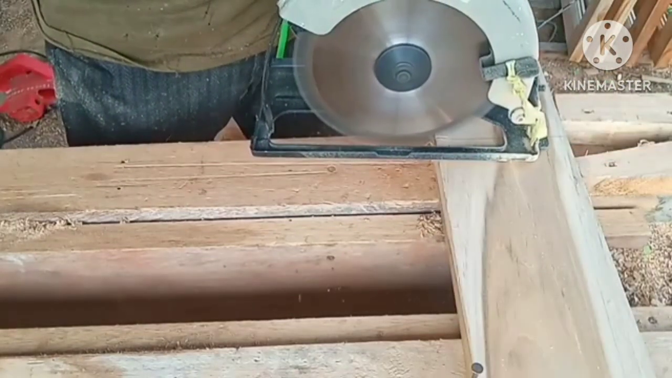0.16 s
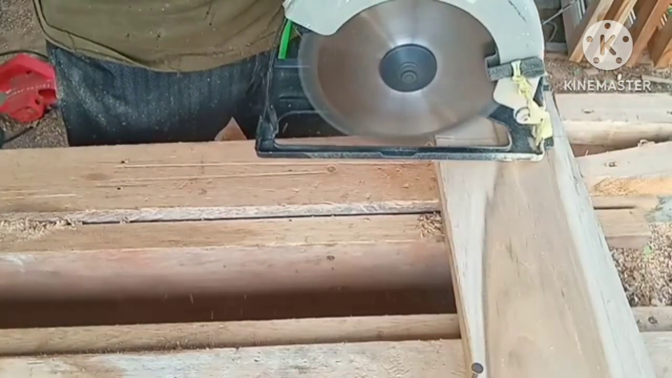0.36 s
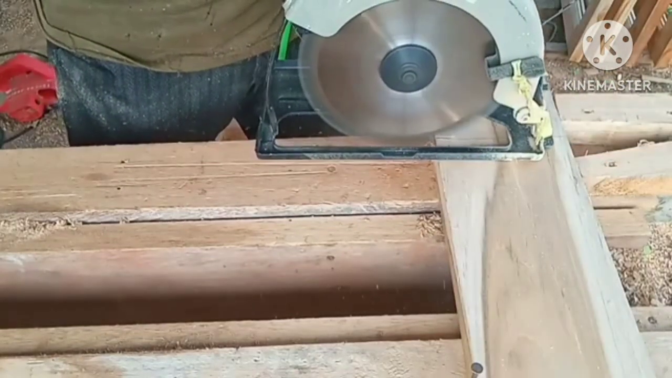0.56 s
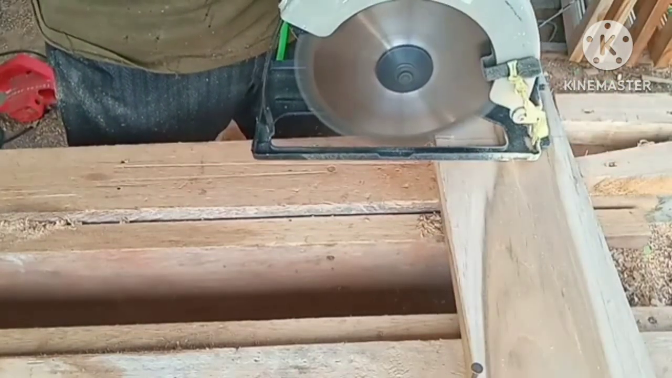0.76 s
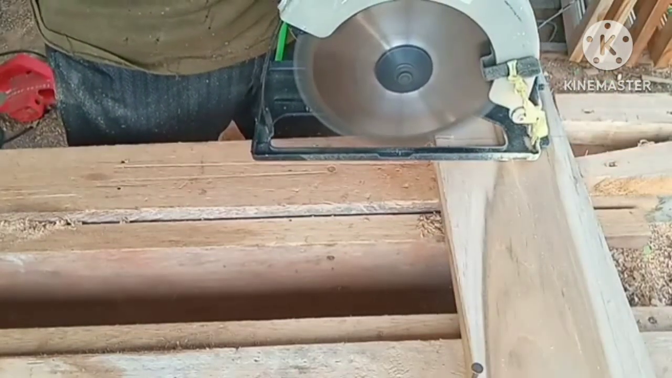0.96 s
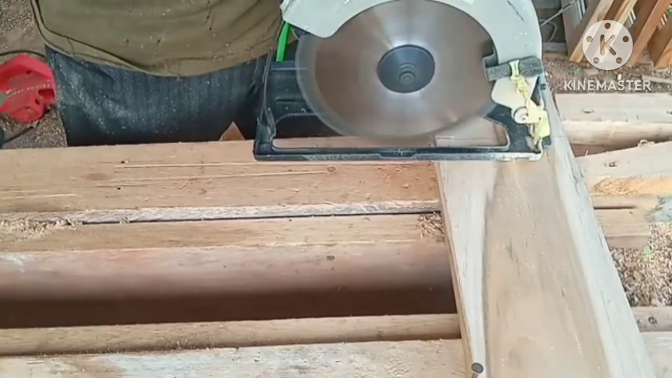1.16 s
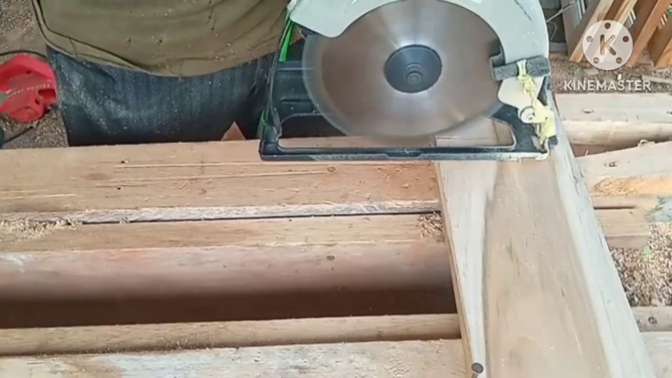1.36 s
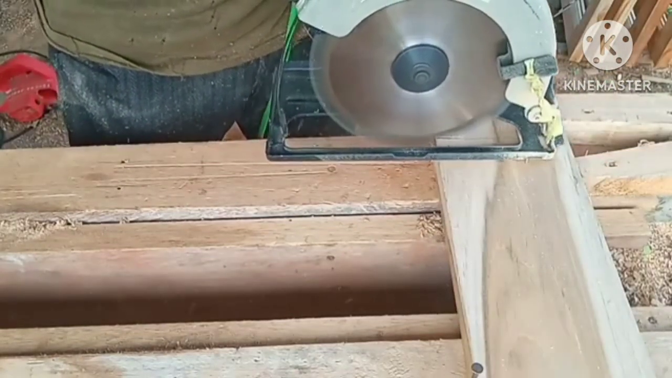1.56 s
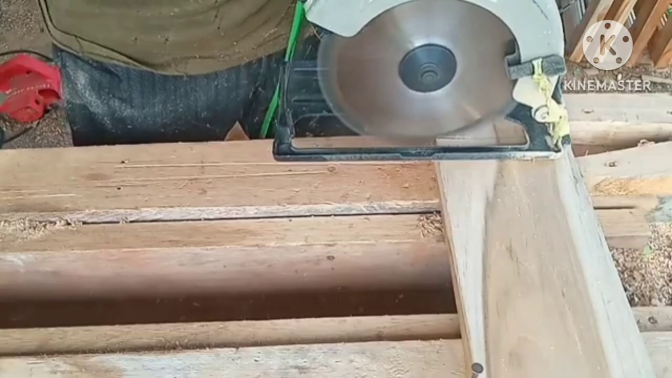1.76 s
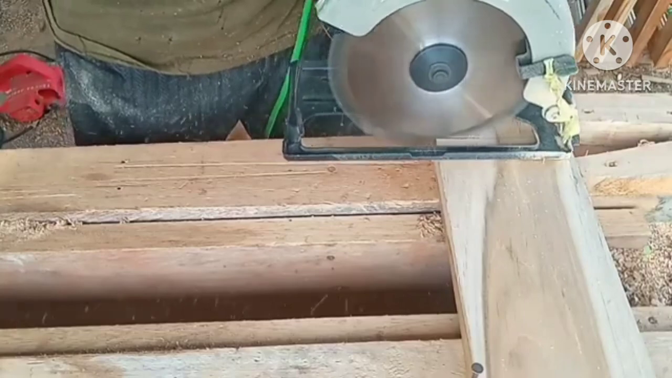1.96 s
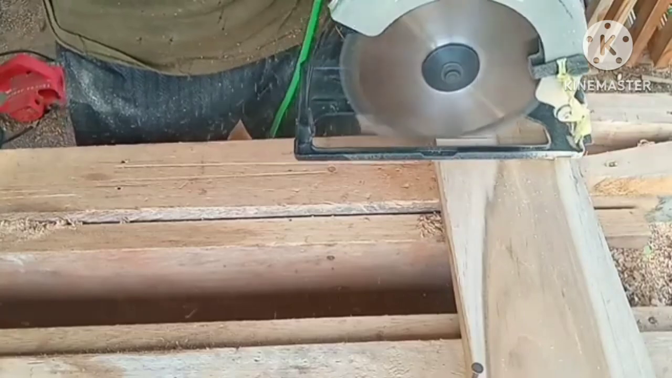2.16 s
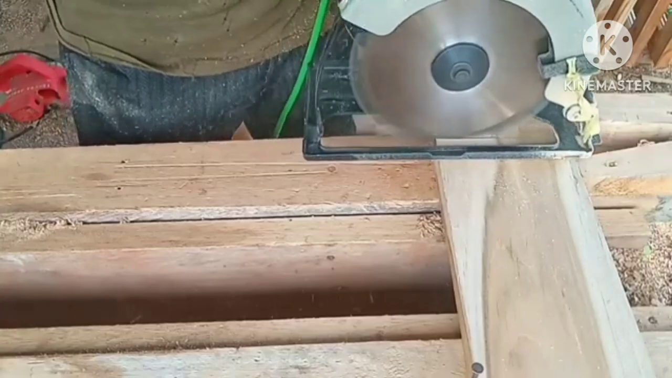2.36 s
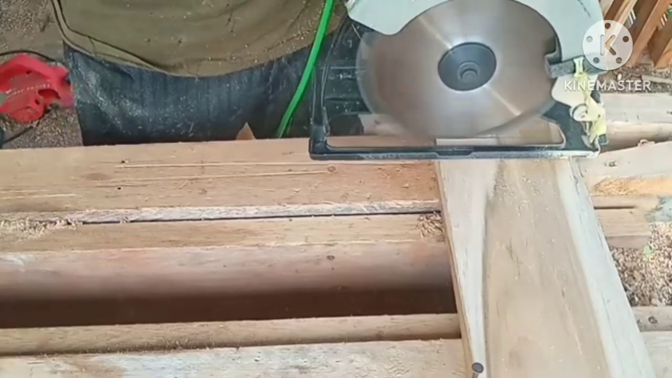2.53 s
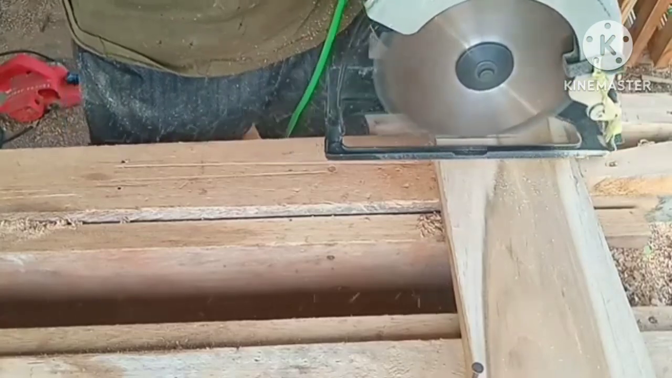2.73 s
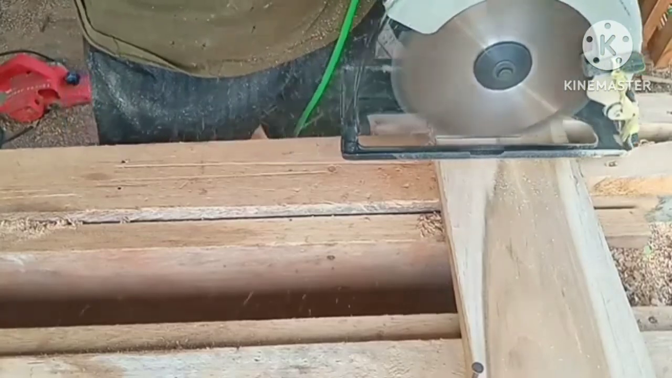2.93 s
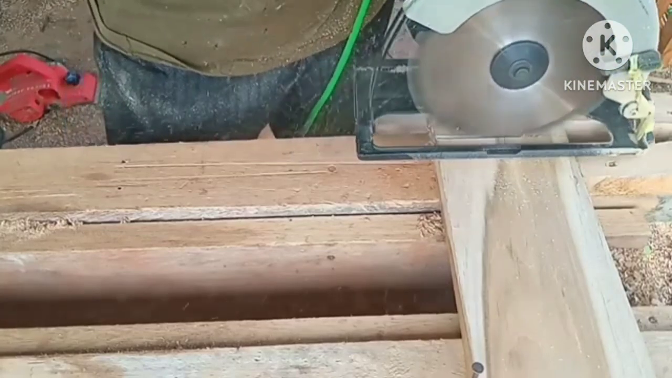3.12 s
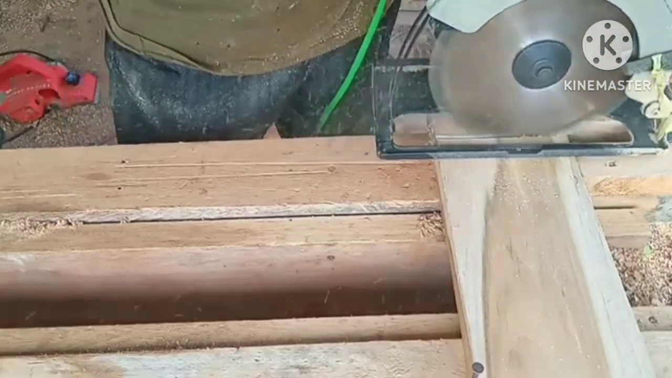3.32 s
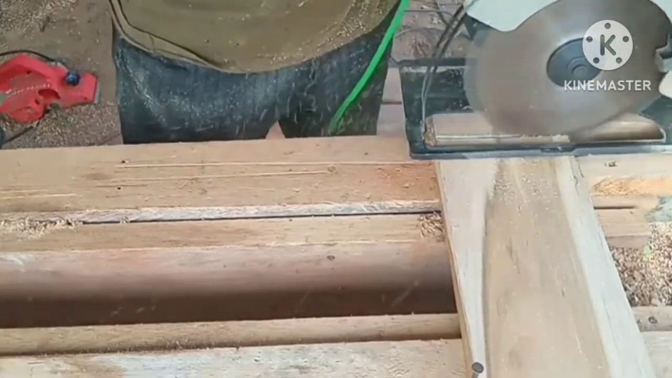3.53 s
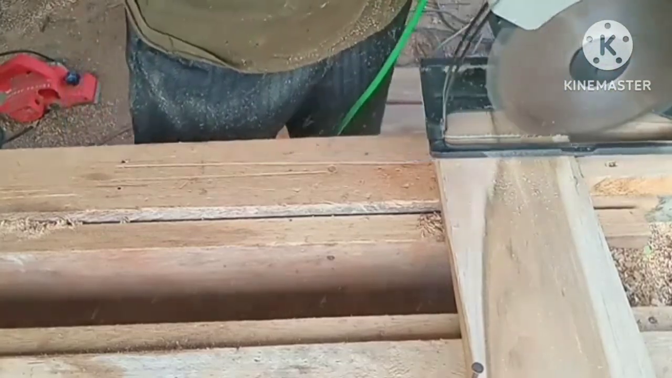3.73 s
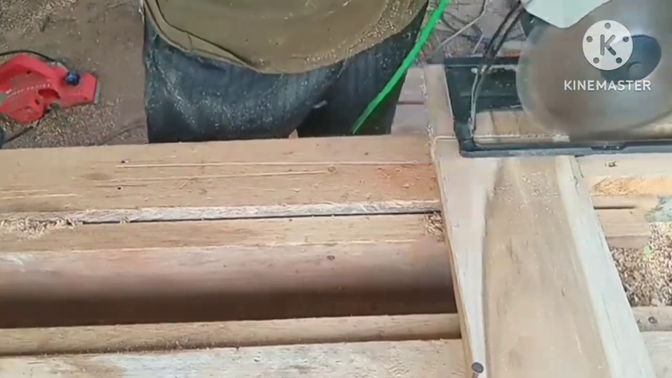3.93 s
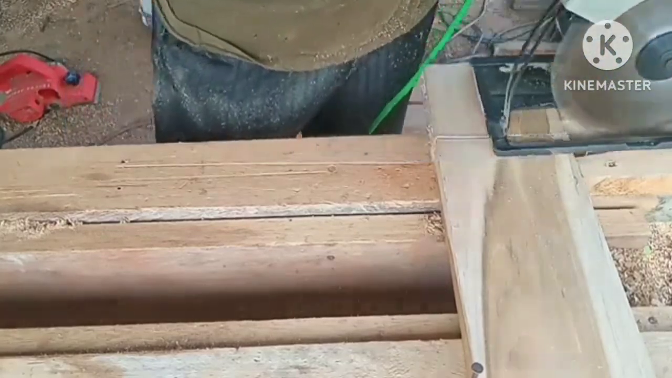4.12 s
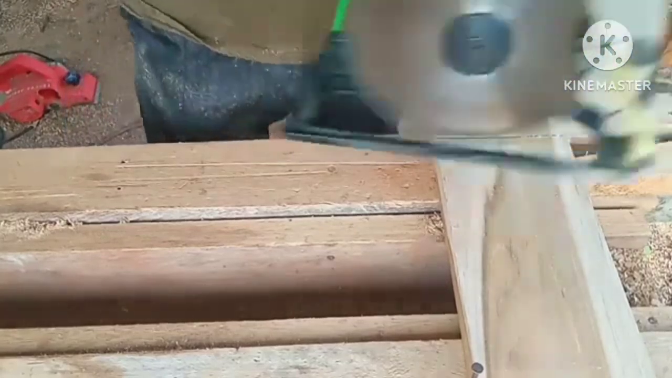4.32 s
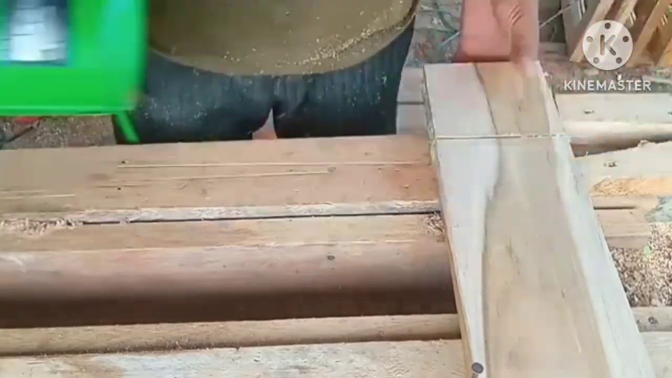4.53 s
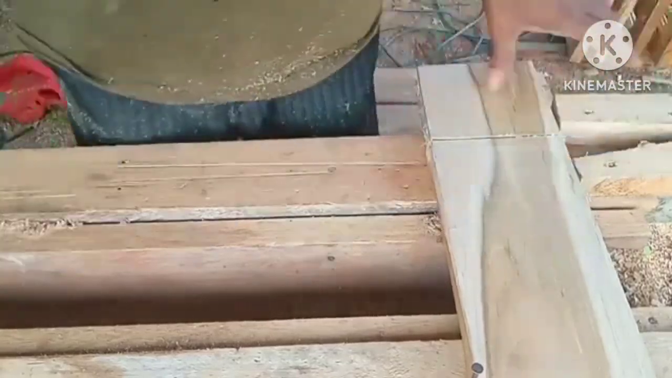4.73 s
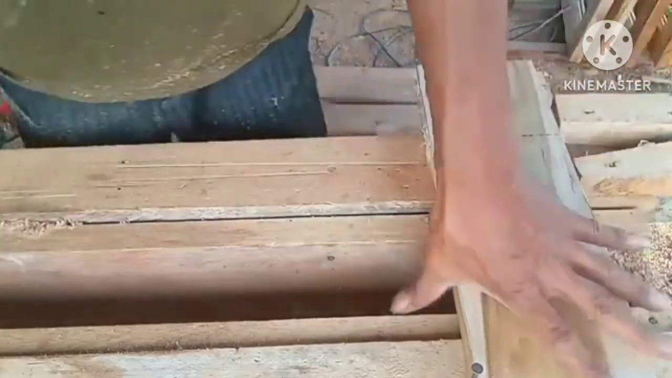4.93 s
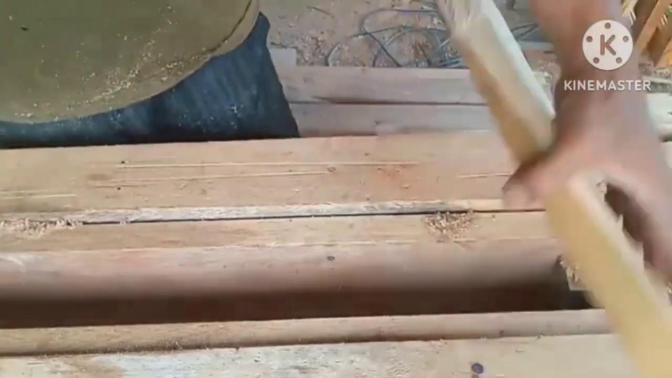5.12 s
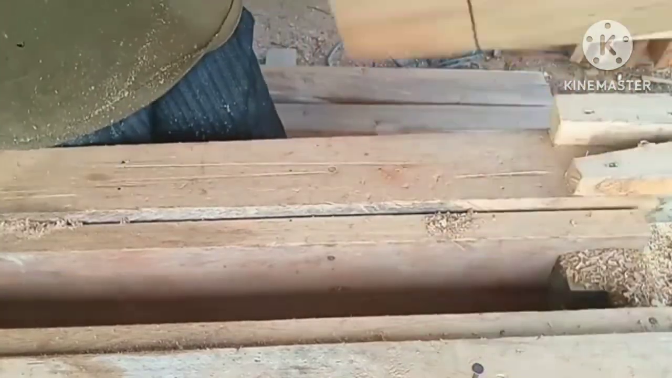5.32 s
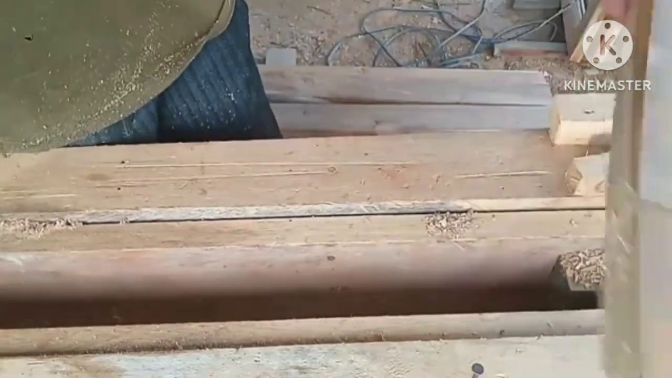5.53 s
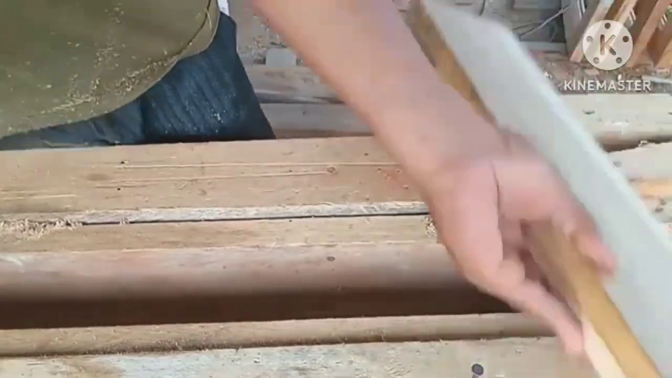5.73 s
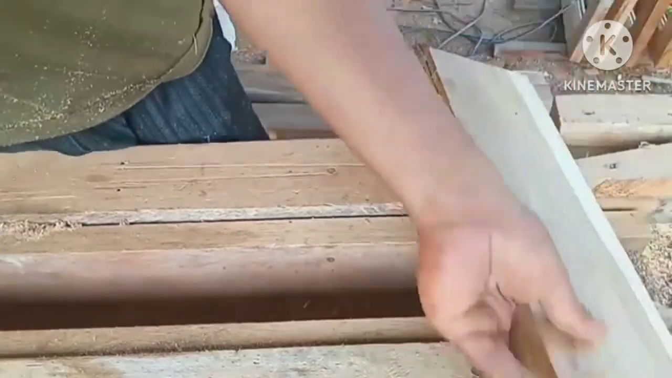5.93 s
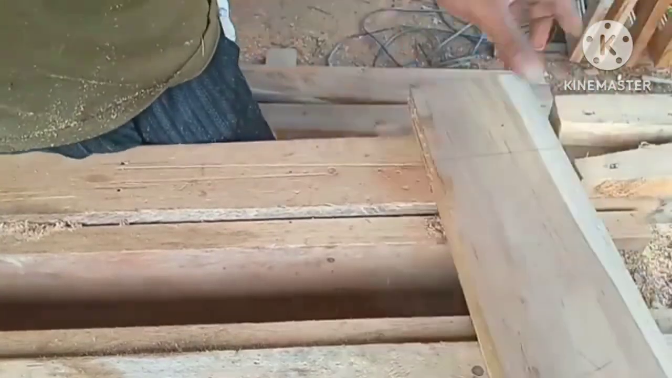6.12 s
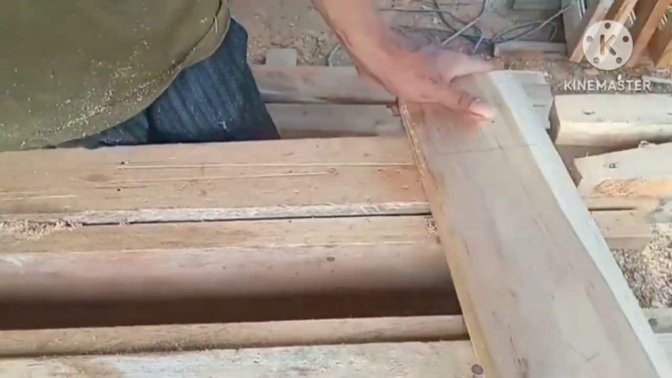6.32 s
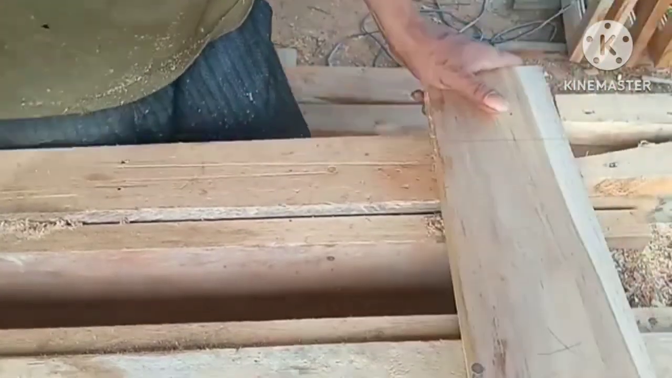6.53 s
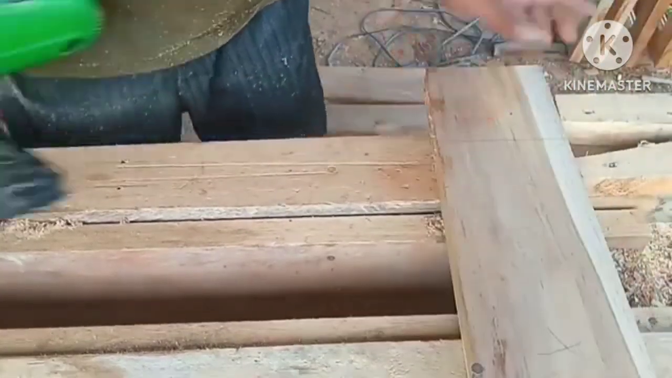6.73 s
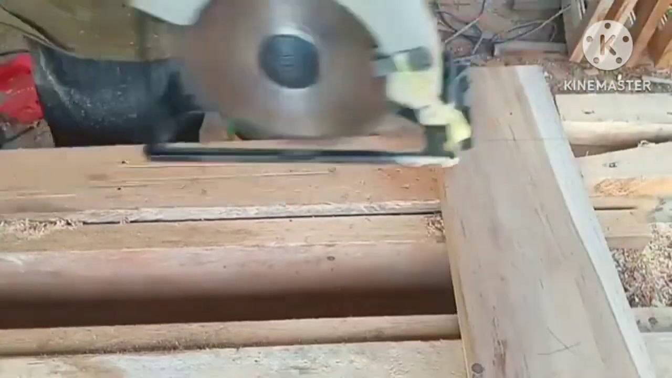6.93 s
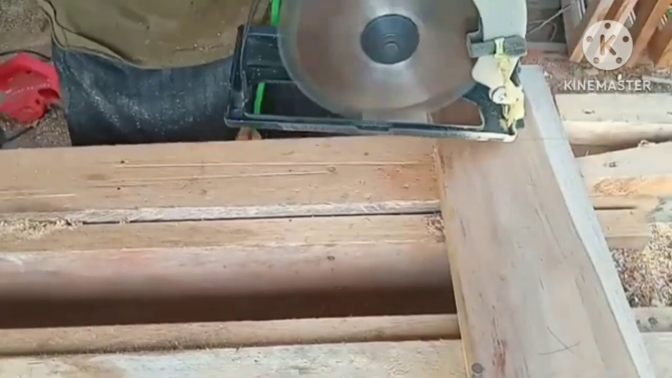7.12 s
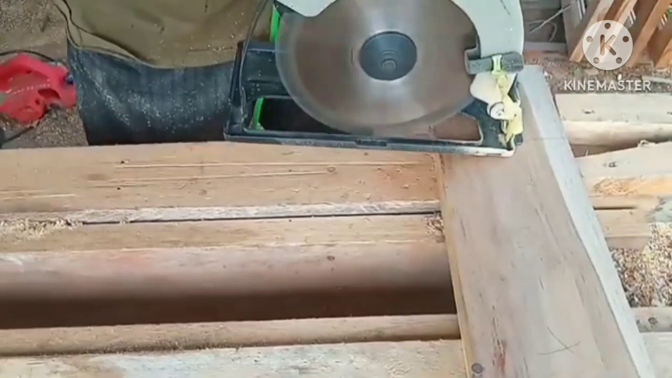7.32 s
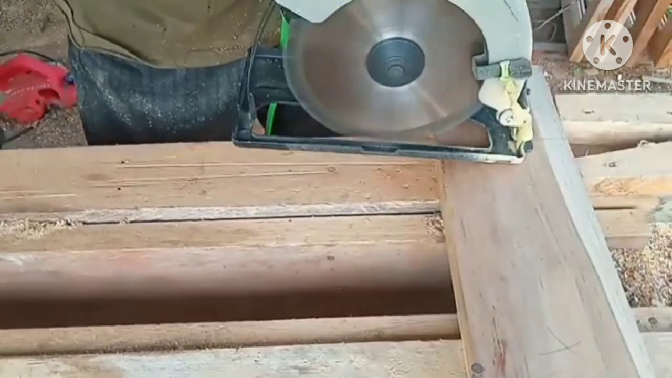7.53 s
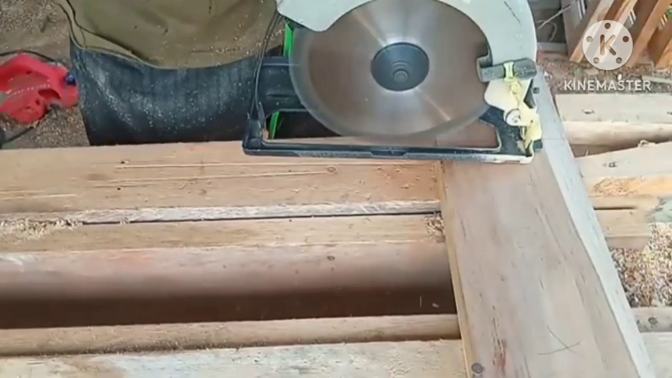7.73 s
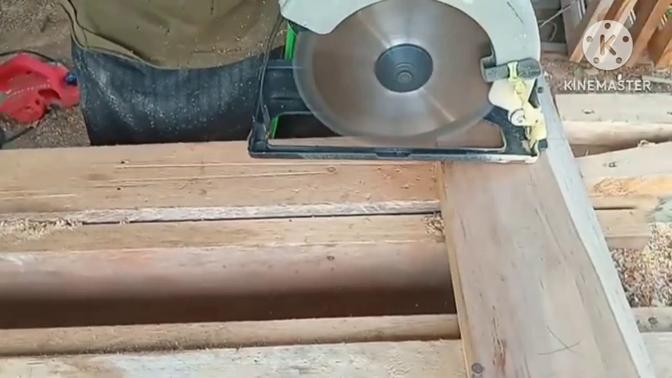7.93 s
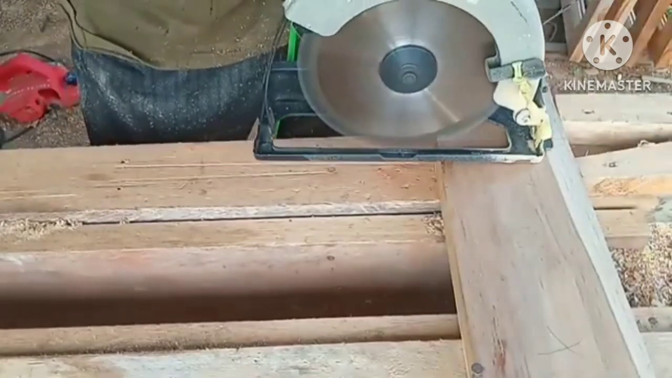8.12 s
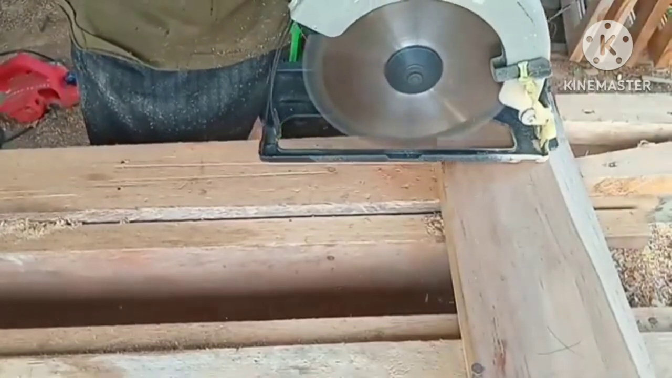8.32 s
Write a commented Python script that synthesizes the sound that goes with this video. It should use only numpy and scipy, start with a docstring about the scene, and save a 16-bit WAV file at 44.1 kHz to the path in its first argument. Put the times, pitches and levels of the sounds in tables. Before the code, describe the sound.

A handheld circular saw tears through a wooden board with a harsh, ringing rasp, its pitch sagging under load. The blade comes free with a brief metallic ring and the motor coasts down in a falling whine. Meanwhile timber slides, bumps and drops with a sharp knock. The trigger clicks, the saw whines up and bites into wood again, all close to one small microphone in a workshop.

```python
"""At a trestle, a handheld circular saw cuts a board, coasts down while the board is turned and dropped,
then is triggered again and bites. In the wood, chips tear as noise, the teeth hammer out a comb of tones
and the steel disc rings. Between cuts come fan air and the whine of gears and commutator, with the
slides, thumps and knocks of timber. The comb and whines drop in pitch as the shaft slows.
One small phone microphone hears it all through a look-ahead limiter."""
import sys
import numpy as np
from scipy import signal
from scipy.fft import rfft, irfft
from scipy.io import wavfile
from scipy.ndimage import uniform_filter1d, minimum_filter1d

SR = 44100
rng = np.random.default_rng(int(sys.argv[2]) if len(sys.argv) > 2 else 0)


def dump_mix(stems):
    """Bounce the given channels to the path in sys.argv[1] as a 16-bit WAV at rate SR."""
    frames = np.atleast_2d(stems).T  # one column per channel
    limited = np.clip(frames, -1, 1)  # hard clip at full scale
    pcm = np.round(limited * 32767).astype(np.int16)
    wavfile.write(sys.argv[1], SR, pcm)


N = 373527

EDGE_HZ = 15400  # top of the audible band in this scene
SLOW_TURNS = 75  # turns per second; the upper whine partials change level relative to this speed
# Spectrum of tearing wood. Each row: frequency in Hz, relative level in dB.
CHIP_SPECTRUM = [(24, -61), (40, -39), (89, -63), (169, -8), (1630, 0.5), (1800, -5.5), (2480, 2),
                 (3180, -0.5), (3690, -0.5), (6070, -6), (6540, -11.5), (7980, -28), (10400, -27.5),
                 (11600, -26), (12500, -42), (13300, -28), (14200, -36), (15500, -32)]
# Spectrum of the fan's rush, which also colours the whines. Each row: frequency in Hz, gain in dB.
AIR_SPECTRUM = [(120, -22), (200, -9), (370, -8.5), (793, 2), (934, 1), (1250, 9), (1930, 0.5), (2270, 8.5),
                (2930, 5.5), (3910, 3.5), (4610, 3.5), (6160, 0), (8530, -25), (12300, -18), (15500, -44)]
# Resonances of the saw's casing. Each row: frequency in Hz, width in Hz, gain in dB.
CASING_MODES = [(2180, 750, 3), (3100, 32, 6.5), (4010, 1240, 5), (5170, 380, 4.5), (6150, 280, -3.5),
                (8870, 55, -20), (9400, 60, -19), (10760, 240, -19.5)]


def amp(db):
    """Decibels to gain."""
    return 10 ** (np.asarray(db) / 20)


def unit_rms(x):
    """Scales to rms 1."""
    return x / np.sqrt(np.mean(x ** 2) + 1e-20)


def spectrum_db(points, hz):
    """A spectrum's level in dB at hz, silent outside its ends."""
    f, db = np.transpose(points)
    return np.interp(np.log(hz + 1), np.log(f + 1), db, left=-90, right=-90)


def spectrum(points):
    """A spectrum in dB as a gain function of frequency."""
    return lambda hz: amp(spectrum_db(points, hz))


def resonances(modes):
    """A set of resonant peaks as a gain function of frequency."""
    return lambda hz: np.sqrt(sum(amp(db) ** 2 / (1 + (2 * (hz - f) / width) ** 2) ** 2
                                  for f, width, db in modes))


def automation(rows):
    """The samples that a table of timed rows spans, and each further column as a curve over them."""
    times, *columns = np.transpose(rows)
    at = np.arange(max(round(times[0] * SR), 0), min(round(times[-1] * SR), N))
    return at, [np.interp(at / SR, times, column) for column in columns]


def wander(per_s, count, size):
    """Rows of smooth random drift, rms 1, one value for every 64 samples."""
    span = max(round(SR / 64 / per_s), 1)
    rows = uniform_filter1d(rng.standard_normal((count, size)), span, 1)
    rows = uniform_filter1d(rows, span // 2 + 1, 1)
    return rows / rows.std(1, keepdims=True)


def noise(colour, patchy_db, flicker_db, size=512):
    """Coloured noise, rms 1, with drifting spectral patches and a flicker of the whole level."""
    frames, hz = N // (size // 4) + 5, np.fft.rfftfreq(size, 1 / SR)
    real, imag, patches = rng.standard_normal((frames, len(hz), 3)).T
    patches = unit_rms(uniform_filter1d(uniform_filter1d(patches, 6, 0), 20, 1))
    flicker = unit_rms(uniform_filter1d(rng.standard_normal(frames), 4))
    spectra = (real + 1j * imag) * colour(hz)[:, None] * amp(patchy_db * patches + flicker_db * flicker)
    return unit_rms(signal.istft(spectra, nperseg=size, noverlap=size - size // 4)[1][:N])


def shaft_tones(speed, partials, swell_db, per_s, wobble, shakes_per_s=120, colour=np.ones_like):
    """Sines at (multiple of shaft speed, dB); each swells and wobbles in phase (cycles) on its own."""
    turns, coarse_speed = np.cumsum(speed) / SR, speed[::64]
    coarse, fine = np.arange(len(coarse_speed)) * 64, np.arange(len(speed))
    swells = wander(per_s, len(partials), len(coarse))
    shakes = wander(shakes_per_s, len(partials), len(coarse))
    out = np.zeros(len(speed))
    for (multiple, db), swell, shake in zip(partials, swells, shakes):
        hz = multiple * coarse_speed
        gain = np.interp(fine, coarse, colour(hz) * (hz < EDGE_HZ) * amp(db + swell_db * swell))
        phase = rng.random() + np.interp(fine, coarse, wobble * shake)
        out += gain * np.sin(2 * np.pi * (multiple * turns + phase))
    return out


def shaft_speed():
    """Turns per second: loaded in the cuts, coasting against friction and fan drag, then running up."""
    # Speed under load, one table a cut. Each row: time in seconds, turns per second.
    cut_speeds = [
        [(0, 235), (.5, 234.8), (.65, 232.5), (.9, 236.2), (1.4, 236.9), (1.6, 233.2), (2, 223.7), (2.4, 211.4),
         (2.6, 207.3), (3.1, 188.6), (3.6, 181.3), (3.8, 197.8), (4.1, 215.8), (4.22, 233), (4.3, 231.8)],
        [(8.1, 218.1), (8.2, 222.8), (8.47, 227.5)],
    ]
    friction, fan_drag = 30.87, .0014217  # deceleration = friction + fan_drag * speed ** 2
    trigger_s, run_up_s, bite_s = 7.485, .253, 8.03
    restart_turns, free_turns = 93, 246.4  # the rising whine begins abruptly at the first
    t = np.arange(N) / SR
    first, second = map(np.transpose, cut_speeds)
    exit_s, exit_turns = first[:, -1]
    balance = np.sqrt(friction / fan_drag)  # the speed at which drag equals friction
    slowed = np.sqrt(friction * fan_drag) * np.clip(t - exit_s, 0, trigger_s - exit_s)
    coast = balance * np.tan(np.arctan(exit_turns / balance) - slowed)
    run_up = free_turns - (free_turns - restart_turns) * np.exp(-np.maximum(t - trigger_s, 0) / run_up_s)
    loaded = np.clip((t - bite_s) / (second[0, 0] - bite_s), 0, 1)
    restart = (1 - loaded) * run_up + loaded * np.interp(t, *second)
    return np.select([t < exit_s, t < trigger_s], [np.interp(t, *first), coast], restart)


def board_handling():
    """Turning the board makes a lumpy rumble and the hiss of wood sliding on wood."""
    # The board's movement. Each row: time in seconds, rumble level in dB, slide level in dB.
    levels = [(4.3, -71, -50), (4.9, -54.5, -45), (5.31, -58.5, -36), (5.97, -45, -40), (6.33, -62.5, -48),
              (6.61, -47.5, -47), (7, -55.5, -67), (7.36, -55, -57), (7.95, -70, -37.5), (8.47, -55, -48)]
    # Spectra of the bumping and the sliding. Each row: frequency in Hz, relative level in dB.
    rumble_spectrum = [(40, -30), (80, -11), (130, -0.5), (200, -8.5), (320, -9), (500, -36)]
    slide_spectrum = [(400, -8), (620, -13), (720, 1), (850, -8.5), (1150, -1), (1400, -5), (1800, -14.5)]
    out = np.zeros(N)
    at, (rumble_db, slide_db) = automation(levels)
    rumble = noise(spectrum(rumble_spectrum), patchy_db=3, flicker_db=2.8, size=1024)[at]
    slide = noise(spectrum(slide_spectrum), patchy_db=-.5, flicker_db=1.6, size=1024)[at]
    out[at] = (amp(rumble_db) * rumble + amp(slide_db) * slide) * signal.windows.tukey(len(at), .02)
    return out


def trestle_thumps():
    """Timber bumps the trestle: a few low cycles each time, quickly damped."""
    # Dull bumps. Each row: start in seconds, envelope peak in dB, pitch in Hz.
    bumps = [(4.669, -44, 174), (5.387, -39, 172), (5.619, -39, 153), (5.735, -26.5, 207), (5.76, -30, 178),
             (5.817, -34.5, 189), (6.498, -45, 116), (6.657, -39, 198), (6.745, -38, 195), (6.85, -37, 160)]
    out, t = np.zeros(N + 4000), np.arange(4000) / SR
    envelope = t / .005 * np.exp(1 - t / .005)
    for start, db, hz in bumps:
        out[round(start * SR):][:len(t)] += amp(db) * envelope * np.sin(2 * np.pi * hz * t)
    return out[:N]


def knocks():
    """Each blow is a short crack plus the ringing modes of the board; dull blows land softly."""
    # Knocks of the board and the trigger. Each row: start in seconds, peak in dB, crack tilt in dB per
    # octave, ring t60 in seconds, pitch in Hz near which the modes ring most.
    blows = [(5.904, -24.5, -5, 0.096, 450), (5.993, -18, -6, 0.11, 556), (6.151, -3.5, -1, 0.14, 950),
             (6.194, -22.5, -6.5, 0.17, 680), (6.552, -21.5, -5.5, 0.13, 685),
             (6.582, -25, -6.5, 0.09, 422), (7.372, -27.5, -2.5, 0.077, 1000),
             (7.486, -9.5, -0.5, 0.12, 2080)]
    # Modes of the board. Each row: frequency in Hz, relative level in dB.
    board_modes = [(300, -2), (440, 2), (680, 0.5), (780, -2.5), (921, 4), (1170, -4), (2126, 6)]
    out, t = np.zeros(N + 9000), np.arange(9000) / SR
    hz = np.fft.rfftfreq(len(t), 1 / SR)
    for start, peak_db, tilt, t60, near_hz in blows:
        ring = sum(amp(db - 13 * abs(np.log2(f / near_hz)) - 60 * t / t60) * np.sin(2 * np.pi * f * t)
                   for f, db in board_modes)
        colour_db = tilt * np.log2(np.maximum(hz, 150) / 900) + spectrum_db(CHIP_SPECTRUM, hz)
        crack = unit_rms(irfft(rfft(rng.standard_normal(len(t))) * amp(colour_db), len(t)))
        crack *= amp(.6 * tilt - 60 * np.maximum(t - .008, 0) / .024)
        attack_s = .0005 - .0017 * min(tilt, 0)
        knock = (.37 * ring + crack) * np.minimum(t / attack_s, 1)
        out[round(start * SR):][:len(t)] += amp(peak_db) * knock / abs(knock).max()
    return out[:N]


def shaft_hum(speed, t):
    """A faint hum that falls with the shaft while the saw is set aside."""
    gate = np.interp(t, [4.5, 4.55, 5.7, 5.75], [0, 1, 1, 0])
    return gate * shaft_tones(speed, [(7 / 3, -60)], swell_db=2.5, per_s=8, wobble=.05)


def commutator_whine(speed, t):
    """The commutator bars pass the brushes and give a thin whine with overtones."""
    # The whine before colouring. Each row: time in seconds, fundamental in dB, octave in dB.
    levels = [(4.15, -60, -56), (4.4, -51, -54), (4.82, -46, -52), (4.96, -57, -45), (5.1, -48, -44),
              (5.26, -60, -52), (5.45, -48, -58), (5.9, -52, -60), (6.05, -58, -60), (6.4, -60, -60),
              (6.7, -56, -53), (6.97, -56, -45), (7.1, -58, -52), (7.22, -58, -47), (7.35, -60, -58),
              (7.62, -54, -58), (7.75, -41, -55), (7.86, -52, -58), (8.47, -48, -58)]
    bars, air = 28, spectrum(AIR_SPECTRUM)
    times, *columns = np.transpose(levels)
    whine_db, octave_db = (np.interp(t, times, db) for db in columns)
    overtones = [(k * bars, db) for k, db in enumerate([-12, -3, -12, 2, -2, -2], 3)]
    whine = shaft_tones(speed, [(bars, 0)], swell_db=3, per_s=10, wobble=.11, colour=air)
    octave = shaft_tones(speed, [(2 * bars, 0)], swell_db=2.5, per_s=15, wobble=.08, colour=air)
    upper = shaft_tones(speed, overtones, swell_db=3, per_s=4, wobble=.08, colour=air)
    upper_db = -55 + .02 * (speed - SLOW_TURNS)
    return amp(whine_db) * whine + amp(octave_db) * octave + amp(upper_db) * upper


def gear_throb(speed, t):
    """The gears' gain pulses unevenly every second turn; near full speed alternate pulses drop away."""
    uneven = .75 * np.repeat(wander(40, count=1, size=len(t) // 64 + 1)[0], 64)[:len(t)]
    hitch = np.interp(t, [7.78, 7.84, 8], [0, 1, 1], right=0)
    beat = np.pi * np.cumsum(speed) / SR + uneven
    throb = np.exp(.95 * (np.cos(beat) - 1) + .8 * hitch * np.cos(beat / 2))
    return throb / np.sqrt(uniform_filter1d(throb ** 2, 4000))


def gear_whine(speed, t, whine_db, octave_db):
    """Meshing gears send a rough, throbbing whine through the housing and rattle the casing."""
    # The whine's path out of the housing. Each row: frequency in Hz, gain in dB.
    housing_path = [(900, -8), (1300, -8), (1500, 3), (1800, -4), (2300, 0), (3600, -4), (4600, 1),
                    (5600, -3), (6200, 4), (7000, -3), (16000, -3)]
    teeth, casing = 21, resonances(CASING_MODES)
    throb = gear_throb(speed, t)
    rattle = amp(whine_db - 9.5) * throb * noise(casing, patchy_db=3.5, flicker_db=2.2)[:len(t)]
    overtones = [(k * teeth, db) for k, db in enumerate([13, 10, 12, -10], 3)]
    whine = shaft_tones(speed, [(teeth, 0)], swell_db=2.4, per_s=12, wobble=.25, shakes_per_s=230)
    octave = shaft_tones(speed, [(2 * teeth, 0)], swell_db=2.5, per_s=10, wobble=.24, shakes_per_s=230)
    upper = shaft_tones(speed, overtones, swell_db=2.8, per_s=12, wobble=.24, shakes_per_s=230)
    upper_db = -56 - .3 * np.clip(speed - SLOW_TURNS, 0, 25)  # strongest at low speed
    mesh = amp(whine_db) * whine + amp(octave_db) * octave + amp(upper_db) * upper
    hz = np.fft.rfftfreq(len(t), 1 / SR)
    housing = (.28 * spectrum(AIR_SPECTRUM)(hz) + .34 * casing(hz)) * spectrum(housing_path)(hz)
    return irfft(rfft(throb * mesh) * housing, len(t)) + rattle


def fan_air():
    """The fan's rush, coloured by the resonant casing."""
    air, casing = spectrum(AIR_SPECTRUM), resonances(CASING_MODES)
    return noise(lambda hz: air(hz) + .5 * casing(hz), patchy_db=2, flicker_db=.63)


def motor(speed):
    """Fan, gears, commutator and hum fade in as the first cut ends."""
    # The motor in the open. Each row: time in seconds, air level in dB, then the gear whine and its
    # octave in dB before the housing colours them.
    levels = [(3.95, -51, -45, -48), (4.2, -37, -45, -48), (4.35, -41, -57, -50), (4.55, -38, -41, -48),
              (4.8, -38.5, -43, -44), (5.05, -37.5, -45, -47), (5.33, -36, -38, -31),
              (5.55, -36.5, -40, -46), (6, -39.5, -35, -50), (6.33, -44, -42, -44), (6.55, -42, -40, -42),
              (6.75, -44, -45.5, -37), (6.95, -40, -35.5, -43), (7.1, -39.5, -50, -38),
              (7.47, -44.5, -46, -46), (7.5, -32.5, -33, -40), (7.64, -37.5, -27, -40),
              (7.8, -39, -32, -42), (7.95, -35, -35, -47), (8.03, -35, -48, -55), (8.47, -45, -55, -55)]
    out = np.zeros(N)
    at, (air_db, gear_db, octave_db) = automation(levels)
    speed, t = speed[at], at / SR
    rush = amp(air_db) * fan_air()[at]
    tones = gear_whine(speed, t, gear_db, octave_db) + shaft_hum(speed, t) + commutator_whine(speed, t)
    out[at] = (rush + tones) * np.minimum((at - at[0]) / 3600, 1)
    return out


def free_disc():
    """Clear of the wood, the steel disc rings on, fluttering as it spins."""
    # Modes of the free disc. Each row: frequency in Hz, width in Hz, relative level in dB.
    modes = [(2589, 30, -10), (3031, 30, -5), (3870, 60, -7), (4990, 70, 2), (9615, 40, -27),
             (10860, 60, -24)]
    flutter_hz, crest_s = 33, 4.186
    out = np.zeros(N)
    at, (db,) = automation([(3.98, -58), (4.08, -43), (4.16, -36), (4.25, -39), (4.32, -47), (4.4, -62)])
    flutter = unit_rms(np.exp(.6 * np.cos(2 * np.pi * flutter_hz * (at / SR - crest_s))))
    ring = noise(resonances(modes), patchy_db=.8, flicker_db=.3, size=2048)[at]
    out[at] = amp(db) * flutter * ring
    return out


def ring_swells(speed):
    """Single pitches swell briefly in the cuts, among them the disc's ring near 2.5, 2.75 and 3.85 kHz."""
    # Brief swells; the fractional ratios are the disc's modes ringing. Each row: start in seconds,
    # end in seconds, pitch as a ratio to the shaft speed, level in dB.
    swells = [(-.1, .2, 23, -42), (-.1, .47, 11, -37), (-.1, .74, 13, -37), (.44, .7, 17, -32),
              (.46, .68, 19, -41), (.84, 1.48, 21, -39), (.88, 1.64, 13, -35), (.88, 1.6, 16, -32.5),
              (.92, 1.48, 10, -39), (.92, 1.52, 14, -41), (1.55, 2.1, 11, -34.5), (1.55, 2.08, 17, -43),
              (1.98, 2.24, 12.5, -36), (2.24, 2.46, 11.6, -39), (2.27, 2.44, 10, -37),
              (2.68, 2.98, 14, -38), (3.28, 3.68, 14, -40), (3.3, 3.47, 16, -42), (3.64, 3.78, 13, -39),
              (3.6, 3.77, 22, -42), (8.05, 8.16, 17.5, -37), (8.16, 8.35, 17.2, -36),
              (8.33, 8.55, 17.3, -36)]
    out, fade_s = np.zeros(N), .04
    for start, end, ratio, db in swells:
        at, (gate,) = automation([(start, 0), (start + fade_s, 1), (end - fade_s, 1), (end, 0)])
        out[at] += gate * shaft_tones(speed[at], [(ratio, db)], swell_db=1.8, per_s=12, wobble=.065)
    return out


def gripped_disc(modes, sag):
    """The kerf grips the ringing disc: as the speed sags, low modes are damped and high ones screech."""
    screech_hz = 6340
    ring = noise(modes, patchy_db=1.6, flicker_db=1.2, size=2048)
    low = signal.sosfiltfilt(signal.butter(4, screech_hz, "low", fs=SR, output="sos"), ring)
    return low * amp(-.11 * sag) + (ring - low) * amp(.075 * sag)


def blade_in_wood(speed):
    """Chips tear as broad noise, tooth blows sound as a comb, the disc rings and the board drones."""
    # Teeth in the wood, one table a cut. Each row: time in seconds, then chip noise, tooth comb and
    # tooth tone in dB.
    cuts = [
        [(0, -32.5, -40, -52), (.1, -32.5, -35.5, -54), (.17, -34, -40, -60), (.43, -34, -41, -54),
         (.52, -32.5, -35, -45), (.84, -36, -57, -36.5), (.91, -32.5, -36.5, -55), (1.3, -33, -40.5, -35),
         (1.64, -34, -40, -44), (1.9, -33, -35.5, -37), (2.02, -33, -36.5, -44), (2.33, -33, -36.5, -48),
         (2.45, -32.5, -40, -31.5), (2.7, -31, -39, -34), (2.9, -33, -37, -28), (3.04, -30, -36, -53),
         (3.5, -30.5, -41, -45), (3.75, -31, -44, -40), (3.89, -30, -35, -30), (3.93, -34.5, -48, -33),
         (3.99, -30, -34, -39), (4.11, -32, -56, -39), (4.2, -48, -55, -60)],
        [(7.8, -66, -55, -55), (7.9, -37, -45, -50), (8, -32.5, -59, -60), (8.11, -37, -31, -39),
         (8.17, -37.5, -41, -39), (8.3, -34, -36.5, -36), (8.47, -34.5, -53, -23)],
    ]
    # Colour of each cut. Each row: ring over chips at light feed in dB, treble shelf in dB, drone at
    # light feed in dB.
    cut_colours = [(-2, -2, -50.5), (0, -3, -47.5)]
    # Modes of the cutting disc. Each row: frequency in Hz, width in Hz, gain in dB.
    disc_modes = [(2560, 60, -2), (2790, 35, 4), (3045, 12, 6), (3360, 30, 1), (3810, 50, 5), (3910, 30, 2),
                  (3960, 20, 4), (4430, 20, -1), (5020, 90, -2), (5240, 80, -2), (5690, 25, -3),
                  (6270, 25, -2), (6410, 120, -4), (6740, 25, -8), (7056, 20, -14), (7260, 60, -17),
                  (7680, 50, -25), (8350, 40, -28), (9360, 20, -24), (9505, 50, -24), (9870, 90, -30),
                  (10118, 20, -27), (10900, 60, -25), (11254, 25, -21), (12000, 200, -30), (12280, 70, -23),
                  (12410, 60, -21), (12600, 300, -28), (12900, 160, -29), (13780, 250, -30)]
    # Spectrum of the droning board. Each row: frequency in Hz, relative level in dB.
    drone_spectrum = [(50, -36), (100, -0.5), (170, 1.5), (330, 1.5), (600, -1.5), (1100, -5)]
    # The comb of tooth blows: relative levels in dB of multiples 8 to 29 of the shaft speed.
    comb_levels = [-15, -5, -9, -5, -9, -5, -10, -7, -8, -8, -12, -7, -16, -9, -9, -9, -9, -13, -14, -18,
                   -19, -21]
    teeth, light_feed_db = 12, -34  # the second is the chip level of a gentle push
    ring_growth, drone_growth = .1, 3.8  # dB gained for each dB of chip noise
    out, partials = np.zeros(N), list(enumerate(comb_levels, 8))
    sag = speed.max() - speed
    chips = noise(spectrum(CHIP_SPECTRUM), patchy_db=1.5, flicker_db=.81)
    drone = noise(spectrum(drone_spectrum), patchy_db=-.5, flicker_db=2.5, size=1024)
    modes = resonances(disc_modes)
    ring = gripped_disc(modes, sag)
    disc = lambda hz: 1 + 1.2 * modes(hz)
    treble = signal.butter(4, 7600, "high", fs=SR, output="sos")
    for levels, (ring_over_db, shelf_db, light_drone_db) in zip(cuts, cut_colours):
        at, (chips_db, comb_db, tooth_db) = automation(levels)
        feed_db = chips_db - light_feed_db
        ring_db = np.minimum(light_feed_db + ring_over_db + ring_growth * feed_db, chips_db + 7)
        drone_db = light_drone_db + drone_growth * feed_db
        lower = shaft_tones(speed[at], partials[:5], swell_db=2.2, per_s=4.6, wobble=.04, colour=disc)
        upper = shaft_tones(speed[at], partials[5:], swell_db=2.2, per_s=5, wobble=.03, colour=disc)
        comb = unit_rms(lower + amp(-.3 * sag[at]) * upper)  # a heavy load dulls the upper comb
        tooth = shaft_tones(speed[at], [(teeth, 0)], swell_db=3.4, per_s=16, wobble=.075)
        cut = amp(chips_db) * chips[at] + amp(comb_db) * comb + amp(ring_db) * ring[at]
        cut += (amp(shelf_db) - 1) * signal.sosfilt(treble, cut)
        cut += amp(drone_db) * drone[at] + amp(tooth_db) * tooth
        bite = np.clip((at - at[0]) / 2500, 0, 1) if at[0] else 1  # the second cut eases in
        out[at] += bite * cut
    return out


def scene():
    """Saw and timber reach one microphone, the same on both channels."""
    speed = shaft_speed()
    saw = blade_in_wood(speed) + ring_swells(speed) + free_disc() + motor(speed)
    mono = saw + board_handling() + knocks() + trestle_thumps()
    return np.array([mono, mono])


def record(dry):
    """A limiter ducks just ahead of sudden jumps and holds; a small capsule rounds peaks, trims lows."""
    power = dry[0] ** 2
    ahead = uniform_filter1d(power, 200, origin=-99)
    before = uniform_filter1d(power, 2000, origin=999)
    jump_db = np.clip(10 * np.log10((ahead + 1e-12) / (before + 1e-12)) - 8, 0, 7)
    jump_db[:2000] = 0
    held_db = -minimum_filter1d(-jump_db, 2300, origin=500)
    ducked = dry / amp(.77 * uniform_filter1d(held_db, 100))
    rounded = .78 * ducked / (1 + (ducked / .15) ** 4) ** (1 / 4)
    thinned = signal.sosfilt(signal.butter(2, 70, "high", fs=SR, output="sos"), rounded)
    band_limit = signal.firwin(1023, EDGE_HZ, window=("kaiser", 9), fs=SR)
    return signal.oaconvolve(thinned, band_limit[None], "same")


dry = scene()
out = record(dry)
dump_mix(out)
```